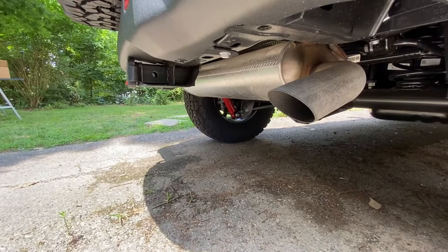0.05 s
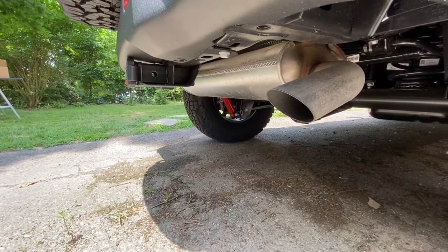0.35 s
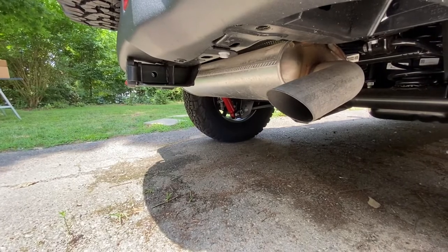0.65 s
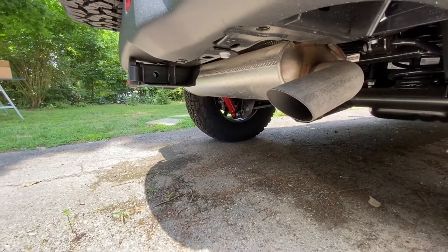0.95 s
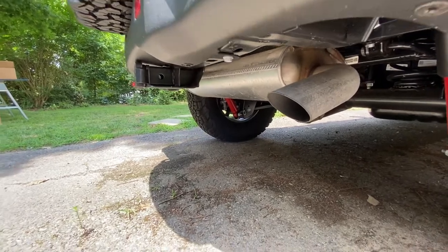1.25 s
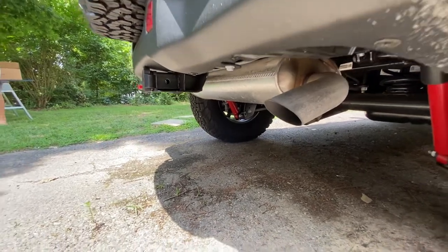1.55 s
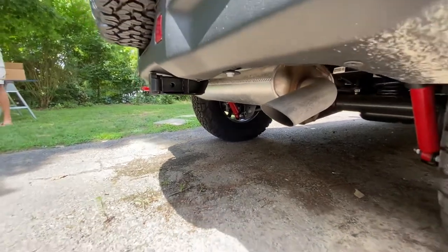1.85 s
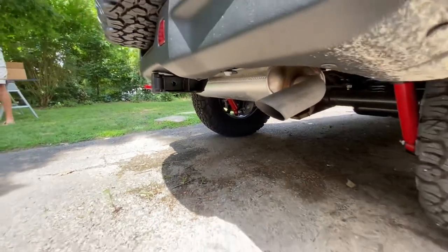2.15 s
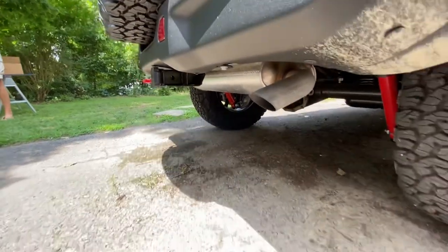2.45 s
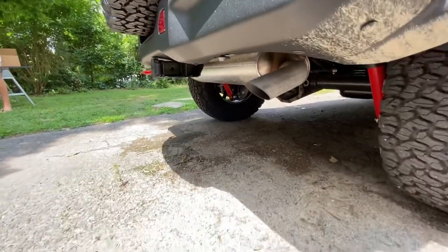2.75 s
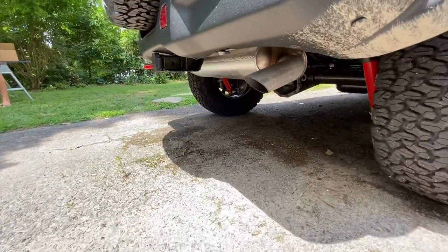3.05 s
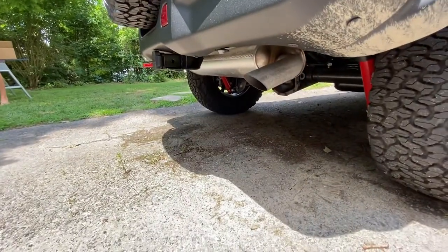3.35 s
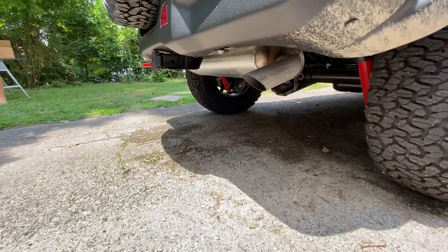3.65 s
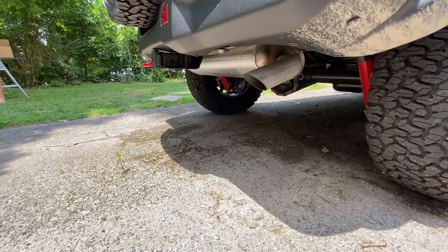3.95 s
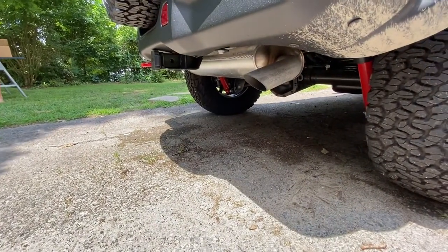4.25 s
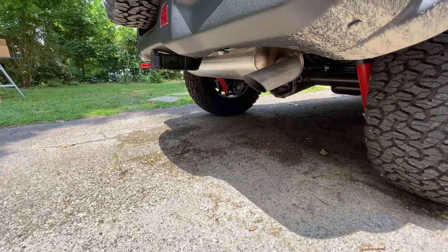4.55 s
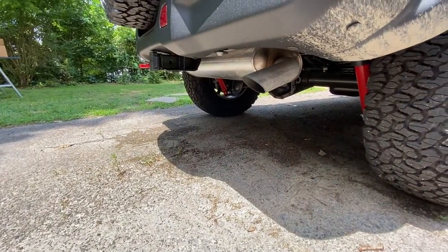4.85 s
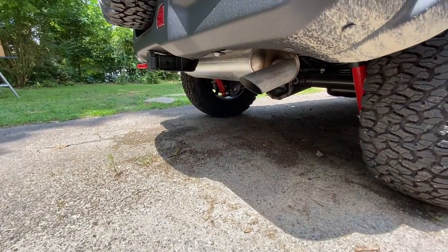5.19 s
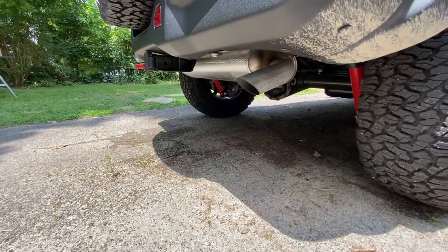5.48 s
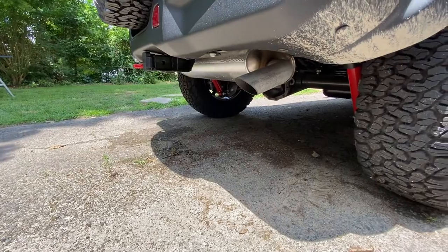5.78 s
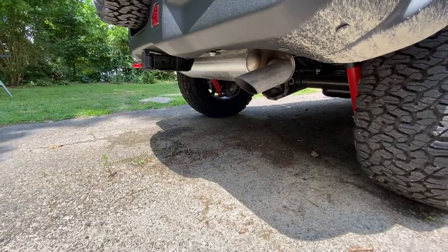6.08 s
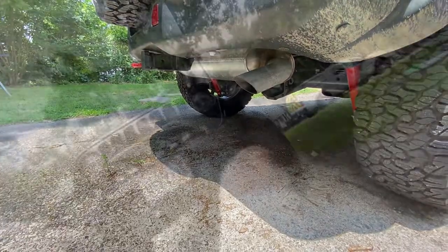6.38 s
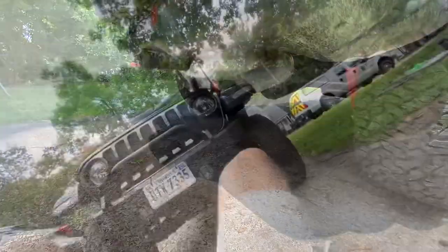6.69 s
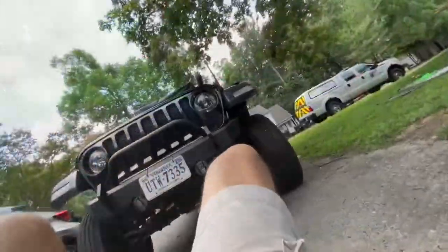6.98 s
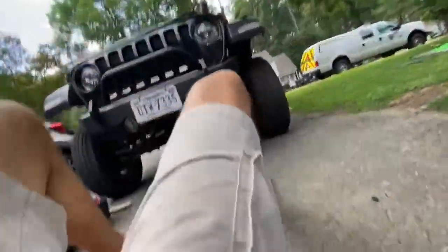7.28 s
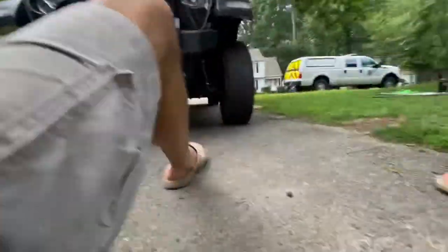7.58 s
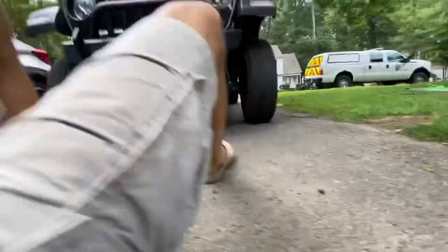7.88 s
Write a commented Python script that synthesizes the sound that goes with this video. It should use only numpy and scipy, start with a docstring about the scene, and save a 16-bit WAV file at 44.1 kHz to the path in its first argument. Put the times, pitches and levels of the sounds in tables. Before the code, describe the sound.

From the start, a four-cylinder car engine idles fast on a driveway, heard close to the tailpipe: a deep, pulsing drone with a growl, a ringing metallic rasp and a hiss of escaping gas. A bird gives short whistles at about 0.9 and 1.4 seconds, and a fainter one just after 2. Between 1 and 3 seconds the engine eases and grows quieter, and the pipe takes on a passing hollow ring. By 4 to 5 seconds it has settled into a slower, slightly lumpy putter with a light knock. From about 6 to 7 seconds it fades away into a quiet yard with soft air and a low hum. Birds chirp from 7 to 8 seconds with a slight echo off the trees. A foot faintly scuffs over grit around 7.3 seconds, followed by three soft low bumps.

```python
"""A turbocharged four-cylinder engine idles on a driveway, heard near its tailpipe as the cold revs settle.
Each firing pushes a low drone, a growl and a rasp out of the ringing pipe, over the hiss of the gas. Birds
whistle now and then, echoed by the trees. The scene then changes to a quiet yard with a low hum, where insects
hiss briefly and a foot scuffs the ground."""
import sys
import numpy as np
from scipy import signal
from scipy.fft import rfft, irfft
from scipy.io import wavfile
from scipy.ndimage import uniform_filter1d

SR = 44100
rng = np.random.default_rng(int(sys.argv[2]) if len(sys.argv) > 2 else 0)


def master_out(mix):
    """Clip the mix to full scale and print it as 16-bit PCM to the path in sys.argv[1]."""
    frames = np.transpose(np.atleast_2d(mix))
    ceiling = np.clip(frames, -1, 1)
    pcm = np.round(ceiling * 32767).astype(np.int16)
    wavfile.write(sys.argv[1], SR, pcm)


N = 354123
TIME = np.arange(N) / SR
FREQ = np.maximum(np.arange(N // 2 + 1) * SR / N, 1)


def undb(db):
    """Decibels to gain."""
    return 10 ** (np.asarray(db) / 20)


def unit(x):
    """Scale to rms 1."""
    return x / np.sqrt(np.mean(x ** 2))


def even(x):
    """Ride the level to rms 1 over every half second."""
    return x / np.sqrt(uniform_filter1d(x ** 2, SR // 2) + 1e-18)


def curves(rows):
    """Automation curves: a table's columns joined by straight lines in time."""
    times_s, *columns = np.transpose(rows)
    return [np.interp(TIME, times_s, column) for column in columns]


def swell(peak_s, length_s):
    """Bell-shaped envelope."""
    return np.exp(-(2 * (TIME - peak_s) / length_s) ** 2)


def colour(points):
    """EQ curve through points of freq_hz, gain_db."""
    hz, db = np.transpose(points)
    return undb(np.interp(np.log(FREQ), np.log(hz), db))


def resonance(hz, width_hz):
    """Response of one damped mode."""
    return 1 / (1 + 1j * (FREQ / hz - hz / FREQ) * hz / width_hz)


def above(hz):
    """Steep high-pass response."""
    return 1 / np.sqrt(1 + (hz / FREQ) ** 16)


def filtered(x, response):
    """Pass a sound through a frequency response."""
    return irfft(rfft(x) * response, N)


def noise(channels=()):
    """White noise, on one or several channels."""
    return rng.standard_normal((*channels, N))


def walk(rate_hz):
    """Smooth random wander with a spread near 1."""
    span = int(SR / rate_hz)
    return unit(uniform_filter1d(uniform_filter1d(noise(), span, mode="wrap"), span, mode="wrap"))


def firings(cycles, at, cylinder_db, scatter_db, jitter):
    """One pulse per firing, no two alike; `at` and `jitter` are fractions of a firing cycle."""
    count = np.arange(int(cycles[0]) + 1, int(cycles[-1]) - 1)
    timing, strength = rng.standard_normal((len(count), 2)).T
    onsets = np.interp(count + at + jitter * timing, cycles, np.arange(N)).astype(int)
    level_db = np.take(cylinder_db, count % len(cylinder_db)) + scatter_db * strength
    return np.bincount(onsets, undb(level_db), N)


def drone(cycles, firing_hz, load, labour):
    """Low firing orders shift with load and swell at standing waves; uneven cylinders lope and thud."""
    # firing orders 1 to 8: unloaded_db, full_load_change_db
    orders = [(-25, 12.5), (-33.5, 15), (-34, 11), (-42, 3.5), (-39.5, -8.5), (-45.5, 2.5), (-51.5, -4),
              (-48, -28)]
    # standing waves along the exhaust: pitch_hz, width_hz, lift_db
    standing_waves = [(75.3, 13.3, 9), (148.3, 10.5, 12), (199, 12.8, 5.5), (222.7, 21.1, 15.5)]
    tone = 0
    for order, (unloaded_db, load_db) in enumerate(orders, 1):
        lift_db = sum(db / (1 + (2 * (order * firing_hz - hz) / width) ** 2)
                      for hz, width, db in standing_waves)
        level_db = unloaded_db + load_db * load + lift_db + .25 * order * walk(30)
        # the overtones notch each crest; the upper ones drag as the engine labours
        lag_cycles = .1 * (load - .4) if order == 1 else .5 + .17 * labour * (order > 2)
        tone += np.sqrt(2) * undb(level_db) * np.cos(2 * np.pi * (order * cycles - lag_cycles))
    strokes = firings(cycles, at=0, cylinder_db=[-3, 3, -3, 1.5], scatter_db=1, jitter=.01)
    uneven = strokes - (strokes > 0) * strokes[strokes > 0].mean()
    muffler = 1.47 * resonance(70.3, 18) - .69 * resonance(129.6, 40) + .9 * resonance(235, 53)
    lope = even(filtered(uneven, muffler * above(22) * (1 - above(270))))
    thud = even(filtered(strokes, resonance(261.7, 64) ** 2 * (1 - above(490))))
    return tone + lope * undb(-34 - 4.5 * load - 5.5 * labour) + thud * undb(-37.5 - 19 * load)


def eddies():
    """Two channels of turbulence that are partly alike."""
    return unit(noise(channels=(2,)) + 1.1 * noise())


def puffs(pulses, decay_s):
    """Turbulence that follows each pulse and dies away."""
    envelope = filtered(pulses, 1 / (1 + 2j * np.pi * FREQ * decay_s) ** 2)
    return unit(envelope * eddies())


def tailpipe(source, cold, modes):
    """Ring the pipe's modes, morphing from their fast-idle balance to their settled one."""
    size = 16384
    freq = np.maximum(np.fft.rfftfreq(size, 1 / SR), 1)
    shapes = np.array([1 / (1 + ((freq / hz - hz / freq) * hz / width) ** 2) for hz, width, *_ in modes])
    low_cut = 1 / (1 + (.88 * modes[0][0] / freq) ** 20) + 1e-4
    voices = []
    for mode_db in np.transpose(modes)[2:]:
        power = undb(mode_db) ** 2 @ shapes * low_cut
        # minimum phase: each ring starts at its pulse and dies away
        cepstrum = irfft(np.log(power))[:size // 2]
        cepstrum[0] = 0
        ring = irfft(np.exp(rfft(cepstrum, size)))[:size // 2]
        voices.append(even(signal.oaconvolve(source, ring[None], axes=1)[:, :N]))
    fast, settled = voices
    return even(cold * fast + (1 - cold) * settled)


def ground(x):
    """The echo off the driveway cuts a notch that climbs as the listener backs away."""
    # ground bounce: time_s, first_notch_hz, echo_gain
    bounce = [(0, 810, 0.03), (1.2, 920, 0.03), (1.8, 1070, 0.43), (2.3, 1280, 0.38), (2.7, 1210, 0.25),
              (3.2, 1310, 0.15)]
    notch_hz, echo_gain = curves(bounce)
    delayed = TIME - .5 / notch_hz
    return even(x + echo_gain * np.array([np.interp(delayed, TIME, row) for row in x]))


def passing_rings(drive):
    """Single pipe rings bloom as the listener passes the tip."""
    # pipe rings: peak_s, length_s, pitch_hz, width_hz, level_db
    blooms = [(1.718, 0.98, 1586, 180, -40), (1.923, 0.5, 1330, 33, -37.5), (2.296, 0.96, 473.7, 16, -40),
              (2.45, 0.97, 651, 20, -41.5), (2.5, 0.78, 1020, 118, -49)]
    return sum(unit(filtered(drive, resonance(hz, width) ** 2)) * undb(db) * swell(peak_s, length_s)
               for peak_s, length_s, hz, width, db in blooms)


def exhaust(cycles, load, labour):
    """Each cylinder's blow-down knocks and rings the pipe, and a weaker pulse follows."""
    # tailpipe modes: pitch_hz, width_hz, fast_idle_db, settled_idle_db
    modes = [(407, 25, 0.5, -6.5), (453, 12, 6, -20), (471, 16.7, 6.5, 0), (549, 30, -14, -8.5),
             (637.3, 27, 1, -4), (655, 10.7, 1.5, -4.5), (688, 15, -20, -2.5), (734, 23, -11, -5),
             (815, 13.7, 5, -1.5), (865, 29, -3.5, -7), (924, 25, -6, -3.5), (961, 17, 4.5, 1.5),
             (1063, 19, 3, 3), (1161, 43, -9.5, -3), (1187, 67, -7, -19), (1293, 18, 1, -13),
             (1327, 24, -0.5, -7), (1370, 41, -6.5, -33), (1458, 35, 0.5, -11), (1506, 17, -2.5, -7),
             (1607, 29, -16.5, -6), (1660, 20, -23, -6.5), (1726, 36, -4, -9.5), (1913, 38, -1.5, -16),
             (2050, 26, -5, -19.5), (2124, 32, -30, -13), (2468, 34, -4, -10), (2630, 26, -13, -17),
             (2750, 11, -12, -12), (3010, 23, 2, -13), (3060, 40, -1.5, -18)]
    # blow-down strength of each cylinder: relative_db
    cylinder_db = [-1.2, 1.8, -1.3, 1.2]
    cold = (load - load.min()) / np.ptp(load)
    blow = firings(cycles, at=-.21, cylinder_db=cylinder_db, scatter_db=.6, jitter=.0015)
    after = firings(cycles, at=.26, cylinder_db=[-1, 0, 1, 0], scatter_db=1.5, jitter=.003)
    pulses = unit(blow) + .4 * unit(after)
    gas = unit(puffs(blow, decay_s=.002) + .6 * puffs(after, decay_s=.002) + 1.7 * eddies())
    # the lowest modes ring clean, more so under load; turbulence roughens those above them
    churn = (.7 - .55 * load) * gas + (1.1 - load) * filtered(gas, above(600) ** 2)
    # the muffler holds back the middle of each pulse, which rounds it into a putter
    putter = filtered(pulses, 1 - 2 * resonance(620, 80))
    growl = tailpipe(putter + churn, cold, [mode for mode in modes if mode[0] < 780])
    chug_db = 2.1 * np.cos(np.pi * (cycles - 1.36))  # peaks on every second firing
    growl *= undb(-37 + .1 * labour + load * (18 + chug_db))
    rasp = tailpipe(pulses + 2.2 * gas, cold, [mode for mode in modes if mode[0] >= 780])
    # the short tip rings for a few cycles only: a knock at low revs, a brighter bark while cold
    knock = even(filtered(blow, resonance(1050, 410) ** 3)) * (.08 + .53 * labour)
    bark = even(filtered(puffs(blow, decay_s=.0007), resonance(1450, 800) ** 2)) * .3 * cold
    rasp = even(ground(rasp) + knock + bark) * undb(-35.5 + 8 * load + 2.5 * labour)
    rasp += passing_rings(pulses + 1.5 * gas)
    return filtered(growl, 1 - above(795)) + filtered(rasp, 1 - above(2840))


def hiss(cycles, load):
    """Gas streams out of the tip, surging with each firing and whistling faintly at narrow resonances."""
    # gas hiss EQ at fast idle: freq_hz, gain_db
    fast_eq = [(2800, -5), (3700, -10), (4400, -10), (5400, -13.5), (7400, -16), (8800, -18.5),
               (10500, -22.5), (14500, -27.5)]
    # gas hiss EQ at settled idle: freq_hz, gain_db
    settled_eq = [(2800, -1), (3500, -4.5), (4100, -11), (4900, -7), (6000, -9), (7800, -14), (10500, -15),
                  (14500, -25)]
    # whistling resonances: pitch_hz, width_hz, fast_lift_db, settled_lift_db
    rings = [(3966, 80, -9, 9.5), (4320, 130, 0, 8.5), (5470, 69, 7, 3), (7300, 240, 6, -4)]
    surge_db = 1.1 * np.cos(2 * np.pi * (cycles - .04))
    stream = eddies() * undb(surge_db + .4 * walk(25) + .7 * walk(500))
    shapes = np.array([1 / (1 + (2 * (FREQ - hz) / width) ** 2) for hz, width, *_ in rings])
    fast, settled = (unit(filtered(stream, colour(eq) * above(1420) * undb(lift_db @ shapes)))
                     for eq, lift_db in zip((fast_eq, settled_eq), np.transpose(rings)[2:]))
    return even(load * fast + (1 - load) * settled) * undb(-44.5 + 10 * load)


def underbody(direct, scattered, decay_s):
    """Bodywork scatters the sound, so it reaches the two sides with unlike phases and strengths."""
    # stereo width from reflections between ground and underbody: freq_hz, side_gain_db
    spread = [(60, -30), (110, -26), (200, -19.5), (380, -4.5), (700, -7.5), (1290, -2), (2380, 0.5),
              (4400, 0), (8120, 1), (15000, -1)]
    # stereo balance: freq_hz, left_minus_right_db
    balance = [(60, -1), (110, 0.5), (200, -1.5), (380, 3), (700, 3.5), (1290, 6), (2380, 0), (4400, 5.5),
               (8120, 1.5), (15000, -1.5)]
    echoes = rfft(noise() * np.exp(-TIME / decay_s))
    # the long waves simply lead on one side
    phase = echoes / np.abs(echoes) * above(700) + 1j * (1 - above(700))
    side = filtered(scattered, colour(spread) * phase / np.abs(phase)) * undb(-1)
    lean = np.sqrt(colour(balance))
    return np.array([filtered(direct + side, lean), filtered(direct - side, 1 / lean)])


def engine():
    """Revs and load sink as the engine warms, until it labours at its lowest speed."""
    # engine speed: time_s, firing_hz
    revs = [(0, 45.39), (0.4, 45.57), (0.75, 45.35), (0.95, 43.86), (1.25, 44.36), (1.7, 43.97),
            (2.15, 42.27), (2.6, 42.41), (2.95, 41.37), (3.15, 39.38), (3.6, 39.76), (4, 38.76),
            (4.5, 37.32), (4.8, 38.19), (5.2, 36.78), (5.6, 37.17), (6.3, 36.84)]
    # cold-start load: time_s, share_of_full_load
    warm_up = [(0.6, 0.78), (1.2, 0.68), (1.7, 0.57), (2.2, 0.41), (2.7, 0.32), (3.2, 0.22), (4.3, 0.17),
               (7, 0.17)]
    firing_hz, load = curves(revs)[0], curves(warm_up)[0]
    cycles = np.cumsum(firing_hz) / SR + 3.87  # running count of firings
    labour_below_hz, labour_span_hz = 38.64, 1.85
    labour = np.clip((labour_below_hz - firing_hz) / labour_span_hz, 0, 1)
    low_end = drone(cycles, firing_hz, load, labour)
    direct, scattered = low_end + exhaust(cycles, load, labour) + hiss(cycles, load)
    return underbody(direct, scattered, decay_s=.005)


def birds():
    """Each trembling note swells as it glides to a turning pitch, then settles toward its end pitch."""
    # bird notes: start_s, length_s, rise_s, start_hz, turn_hz, end_hz, level_db, drop_db
    whistles = [(0.866, 0.17, 0.029, 2825, 2590, 2630, -35.5, 7),
                (1.422, 0.093, 0.033, 3220, 3140, 3170, -36, 10),
                (2.11, 0.077, 0.06, 3320, 3620, 3660, -46, -2),
                (6.925, 0.038, 0.018, 2650, 2700, 2810, -53, 3),
                (6.972, 0.058, 0.039, 2860, 2755, 2650, -48, 3),
                (7.022, 0.064, 0.033, 2520, 2320, 2260, -59, 5),
                (7.385, 0.064, 0.023, 3100, 3080, 2650, -56, 7),
                (7.428, 0.15, 0.032, 3220, 3250, 3320, -47.5, 12),
                (7.507, 0.031, 0.028, 2600, 3040, 3060, -39, 3),
                (7.533, 0.14, 0.0076, 2760, 2750, 2533, -47.5, -3),
                (7.958, 0.094, 0.032, 2040, 2530, 2530, -58, -18)]
    settle_s, release_s = .0342, .0069
    song = np.zeros(N)
    tremble = 1 + .008 * walk(220)
    for start_s, length_s, rise_s, start_hz, turn_hz, end_hz, level_db, drop_db in whistles:
        note = (TIME >= start_s) & (TIME < start_s + length_s)
        t = TIME[note] - start_s
        gliding = start_hz + (turn_hz - start_hz) * t / rise_s
        settling = end_hz + (turn_hz - end_hz) * np.exp(-np.maximum(t - rise_s, 0) / settle_s)
        pitch_hz = np.where(t < rise_s, gliding, settling) * tremble[note]
        attack = np.minimum(t / max(rise_s, .006), 1)
        release = np.minimum((length_s - t) / release_s, 1)
        envelope = np.sin(np.pi / 2 * attack * release) ** 2 * undb(level_db - drop_db * t / length_s)
        song[note] += envelope * np.sqrt(2) * np.sin(2 * np.pi * np.cumsum(pitch_hz) / SR)
    return song * undb(1.2 * walk(70))


def tree_echo(song, t60_s, wet_db):
    """The trees add a diffuse stereo tail; nearby walls and branches crowd its start."""
    early_lift = 1 + 2.5 * np.exp(-TIME[:SR] / .018)
    tail = rng.standard_normal((2, SR)) * undb(-60 * TIME[:SR] / t60_s) * early_lift
    tail /= np.sqrt(np.sum(tail ** 2, axis=1, keepdims=True))
    return song + undb(wet_db) * signal.fftconvolve(song[None], tail, axes=1)[:, :N]


def yard():
    """Outdoor air with a wavering low hum; the bass is alike on both sides."""
    # yard air EQ: freq_hz, gain_db
    air_eq = [(18, -39), (30, -23), (65, 2), (120, -6), (200, -11), (243, -11), (317, -22.5), (859, -32),
              (1240, -31), (2220, -32.5), (2560, -29), (2890, -35), (3110, -35), (3690, -33),
              (10000, -46.5), (12000, -70), (15000, -64)]
    mid = unit(filtered(noise(), colour(air_eq))) * undb(-51 + 1.7 * walk(7.9))
    side = unit(filtered(noise(), colour(air_eq)))
    side = filtered(side, np.minimum(FREQ / 900, .85)) * undb(-45.5)
    hum_db = -49.5 + 2.8 * walk(7.4)
    hum_hz = 120 + 1.3 * walk(3.5)
    hum = undb(hum_db) * np.sin(2 * np.pi * np.cumsum(hum_hz) / SR)
    return mid + hum + np.array([side, -side])


def insects_and_footwork():
    """Insects hiss briefly near 6 kHz; a sole brushes over grit, and a few soft bumps follow."""
    # insect hiss, scuffs and grit: peak_s, length_s, centre_hz, width_hz, level_db
    scuffs = [(6.988, 0.0075, 7100, 4000, -54), (7.187, 0.61, 5730, 1790, -61.5),
              (7.29, 0.012, 1500, 1830, -56), (7.361, 0.067, 8450, 2200, -53.5),
              (7.352, 0.077, 5900, 2200, -53), (7.368, 0.0041, 1500, 1800, -46),
              (7.44, .04, 8700, 2000, -66)]
    # soft low bumps: peak_s, pitch_hz, length_s, peak_db
    bumps = [(7.482, 110, 0.025, -40), (7.592, 84, 0.015, -36), (7.865, 89, 0.028, -41)]
    foot = np.zeros((2, N))
    for peak_s, length_s, hz, width, db in scuffs:
        grit = unit(filtered(noise(channels=(2,)), resonance(hz, width) ** 2))
        foot += grit * undb(db) * swell(peak_s, length_s)
    for peak_s, hz, length_s, db in bumps:
        foot += undb(db) * swell(peak_s, length_s) * np.cos(2 * np.pi * hz * (TIME - peak_s))
    return foot


def scene():
    """The idling engine cross-fades into the yard; birds call over both, and insects hiss and a foot scuffs
    near the end."""
    # cross-fade from engine to yard: start_s, end_s
    fade_s = (6.13, 7.107)
    fade = np.interp(TIME, fade_s, (0, 1))
    bed = (1 - fade) * engine() + fade * yard()
    return bed + insects_and_footwork() + tree_echo(birds(), t60_s=.9, wet_db=-4.5)


def record(dry):
    """A quick fade-in and a steep cut of the highest treble."""
    fade_in_s, top_hz = .004, 15300
    low_pass = signal.ellip(8, .2, 70, top_hz, fs=SR, output="sos")
    return signal.sosfilt(low_pass, dry * np.minimum(TIME / fade_in_s, 1))


dry = scene()
out = record(dry)
master_out(out)
```